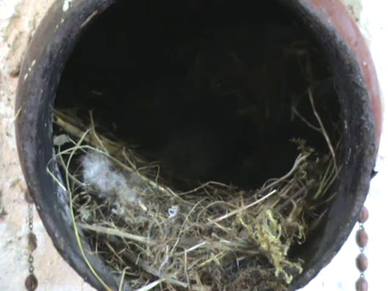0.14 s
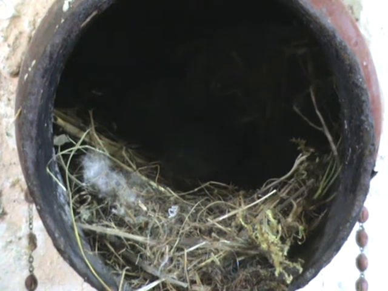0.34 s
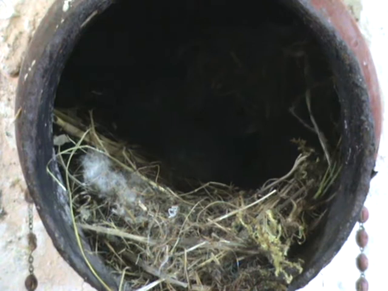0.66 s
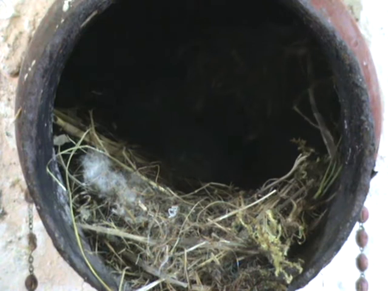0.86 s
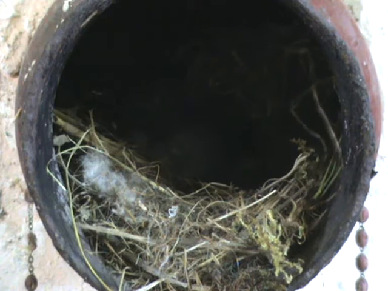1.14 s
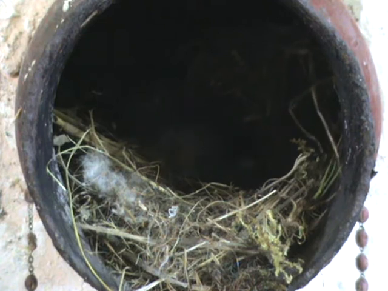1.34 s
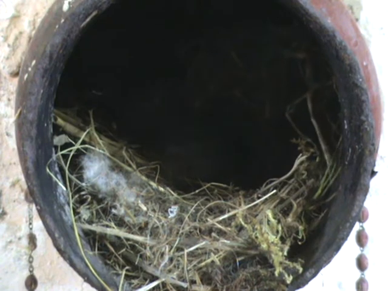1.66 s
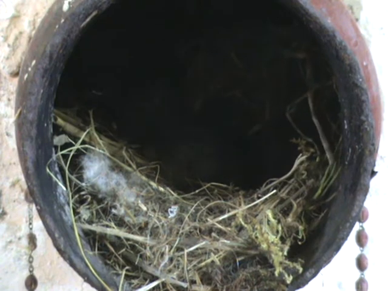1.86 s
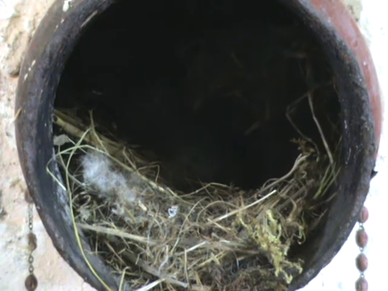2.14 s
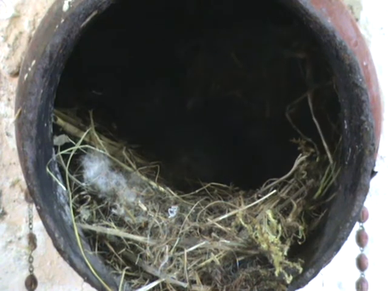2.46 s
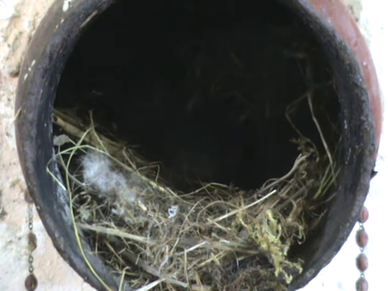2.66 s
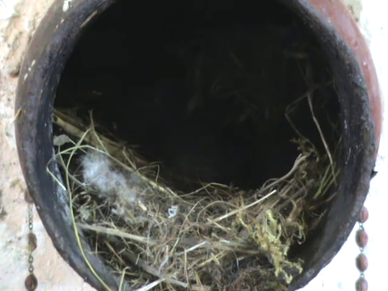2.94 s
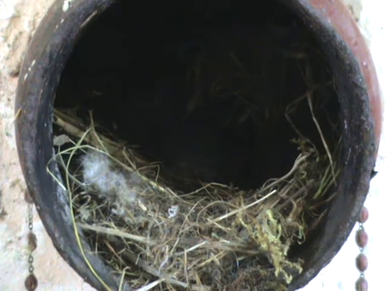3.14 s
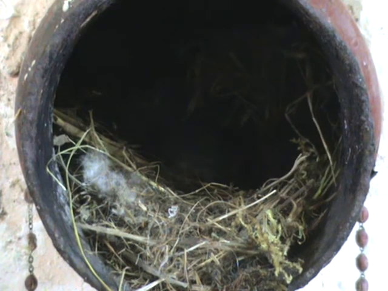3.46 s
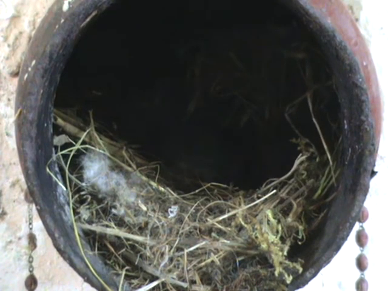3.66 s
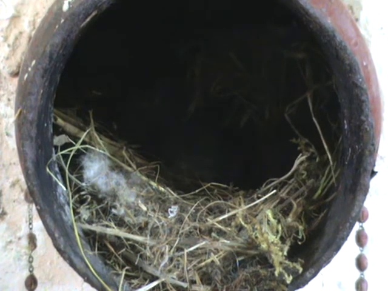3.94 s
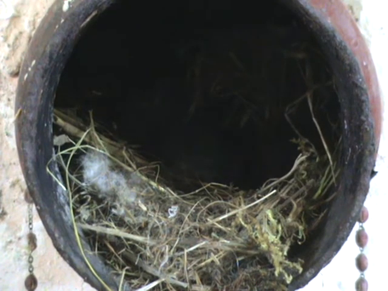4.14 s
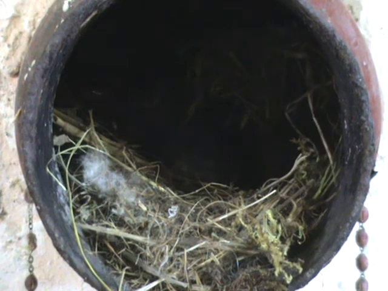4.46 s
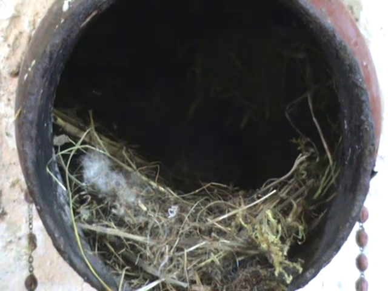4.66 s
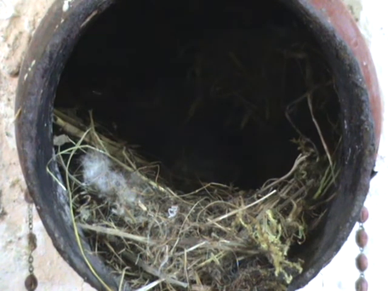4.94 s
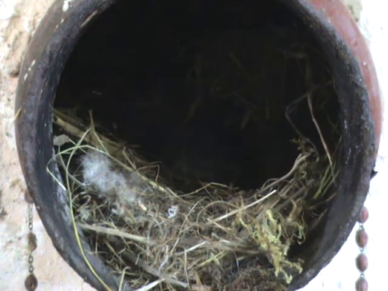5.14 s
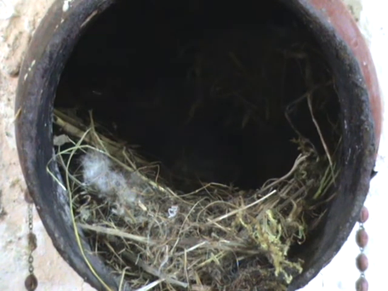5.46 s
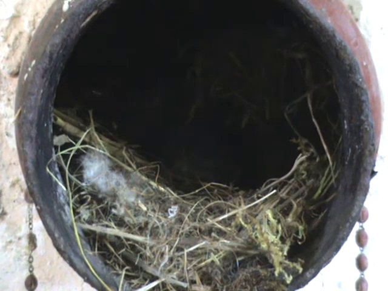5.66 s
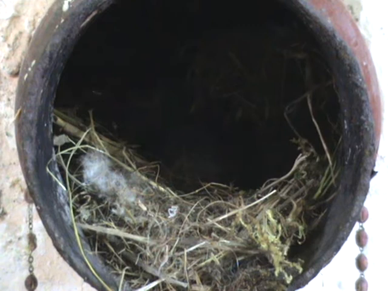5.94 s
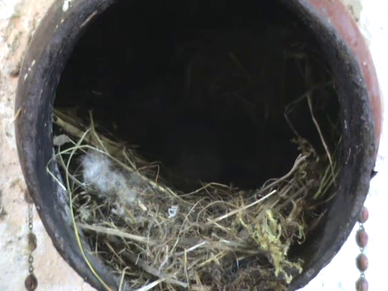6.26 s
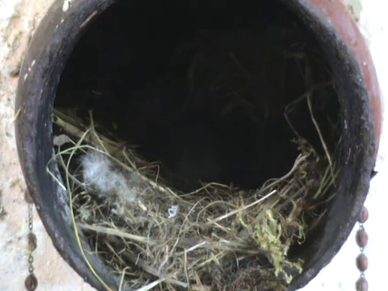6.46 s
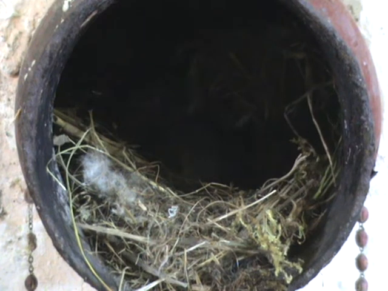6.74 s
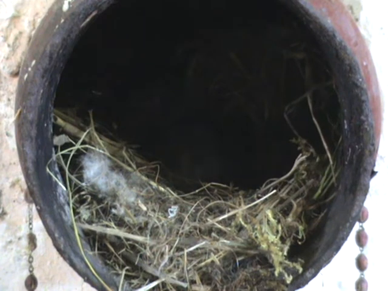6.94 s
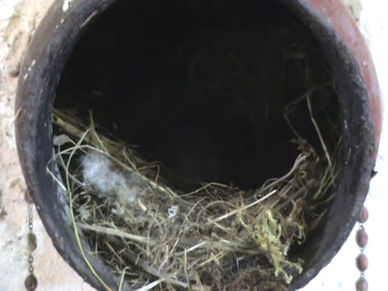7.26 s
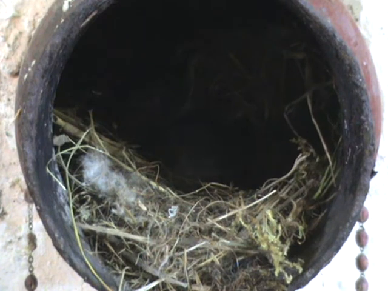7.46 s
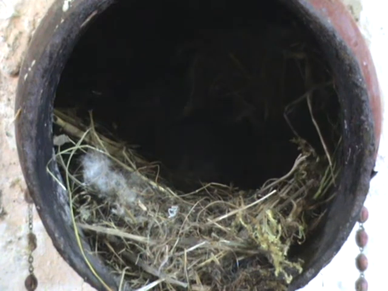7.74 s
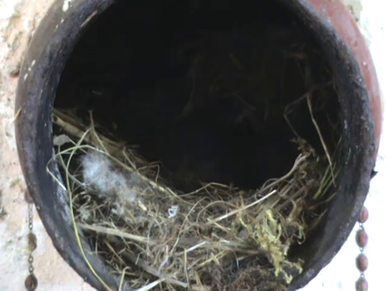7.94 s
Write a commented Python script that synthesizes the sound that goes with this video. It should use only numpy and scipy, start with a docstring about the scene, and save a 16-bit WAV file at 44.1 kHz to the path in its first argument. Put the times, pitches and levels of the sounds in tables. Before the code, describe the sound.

Rapid, needle-sharp begging chirps, each under a tenth of a second with a fast buzzy flutter, come from near the microphone and ring briefly in the pot. They start strong and dense, become scattered after three seconds, and fade to isolated weak peeps after six. Underneath are a very quiet steady hiss, low hum, slight nest rustles and, later, remote slurred bird whistles.

```python
"""Nestlings beg from a grass nest inside a clay pot hung on a wall.
Their thin calls are fast trills, often sung with both sides of the syrinx, and ring on in the pot; the begging thins out.
A chick knocks against the nest, other birds whistle far away, and a faint hum and hiss lie underneath."""
import sys
import numpy as np
from scipy import signal
from scipy.fft import rfft, irfft
from scipy.io import wavfile
from scipy.ndimage import map_coordinates

SR = 44100
rng = np.random.default_rng(int(sys.argv[2]) if len(sys.argv) > 2 else 0)


def master_out(mix):
    """Clip the mix to full scale and print it as 16-bit PCM to the path in sys.argv[1]."""
    frames = np.transpose(np.atleast_2d(mix))
    ceiling = np.clip(frames, -1, 1)
    pcm = np.round(ceiling * 32767).astype(np.int16)
    wavfile.write(sys.argv[1], SR, pcm)


N = 357210

# first bounces off the pot wall: (delay ms, dB)
WALL_BOUNCES = [(0.446, -12.5), (1.151, -16), (1.899, -18)]
# whistles of distant birds: (s, length s, first pitch Hz, last pitch Hz, level dB, rasp Hz)
WHISTLES = [(5.25, 0.29, 4100, 3337, -70, 59.3), (5.898, .31, 4090, 3263, -68.5, 60.7), (6.281, 0.28, 7160, 6430, -70, 90),
            (6.349, 0.11, 3560, 3510, -73, 25), (6.706, 0.086, 3530, 3600, -73, 60), (7.09, 0.12, 3530, 3610, -71, 25),
            (7.154, 0.52, 6670, 6400, -81, 90), (7.46, .06, 4800, 4600, -78, 150),
            (7.705, 0.077, 4400, 3860, -73, 220), (7.792, 0.042, 2790, 2710, -71, 160), (8.038, 0.067, 3690, 3420, -70.5, 298)]
TWITTER_COLOUR = [(1500, -17), (2200, 0), (3300, 2.5), (3900, -12), (5000, -59)]   # (Hz, dB)
# chicks stirring: (s, knock on the pot dB, straw crackle dB)
STIRS = [(.348, -69, -60), (.369, -60, -75), (.496, -86, -70), (.778, -60, -70), (.81, -70, -62), (2.378, -88, -66), (3.099, -88, -66), (3.775, -88, -65), (4.092, -76, -70), (5.018, -74, -60.5), (6.974, -88, -66.5)]
POT_MODES = [(757, 3, 0.039), (920, 6.5, 0.039), (1150, 1, 0.06), (1380, 2, 0.02), (2150, -1, 0.053), (3630, 4.5, 0.017)]   # (Hz, dB, t60 s)
# steady hum: (Hz, dB common to both channels, dB opposed between them)
HUM = [(71.2, -75.5, -100), (352, -85, -94), (488, -91.5, -86), (769, -90.5, -87), (841, -80.5, -81), (910.4, -82, -77), (1187, -92, -78.5), (1257, -93, -73), (1340, -94.5, -85)]
# hiss common to both channels, and hiss opposed between them: (Hz, dB per Hz)
COMMON_HISS = [(25, -12), (45, 8.5), (60, 5), (100, 4), (160, 2.5), (400, 0), (1000, -2), (2000, -4), (5000, -4), (9000, -6), (13000, -6.5), (16000, -6)]
OPPOSED_HISS = [(24, -48), (40, -22), (103, -8), (387, -1.5), (778, -2), (1100, -8.5), (1220, -8.5), (1820, -6),
                (3560, -12.5), (5860, -15.5), (6480, -18), (6980, -18.5), (15500, -30)]
COMMON_DB, OPPOSED_DB = -69.5, -67
POT_T60_S, POT_RING_DB = 0.6, -15
CUTOFF_HZ = 15800   # fixed
TIME = np.arange(N) / SR
# each way of calling: (trill depth Hz at the reference level, share of that depth at the start, trill rate Hz,
# throb dB, # attack dB, swell dB, octave overtone dB, first and last pitch of the second, mostly lower voice
# Hz)
VOICES = {"low": (490, .5, 77, -0.5, 8.5, 5.5, -33.5, 6203, 5849.5),
          "high": (405, 0.51, 80, -2, 6, 8.5, -34, 6780, 6594),
          "two-note": (304, 1.1, 75, -0.5, 12, 5.5, -26.5, 6065, 6024),
          "peep": (420, 1.6, 87, 0, 4, 3.5, -22.5, 5906, 7004)}
# begging calls of a low-voiced and a high-voiced chick, and soft peeps: # (s, voice, length s, middle pitch Hz,
# pitch fall Hz, level dB, second voice relative to it dB)
BEGS = [(0.036, "low", 0.091, 6590, 650, -28.5, -21), (0.222, "high", .081, 7280, 400, -34, -6), (0.494, "low", 0.068, 6660, 350, -35, -30),
        (.741, "peep", 0.062, 6890, 750, -44.5, -24), (0.85, "two-note", .073, 6890, 592, -35, -5.5), (1.062, "low", 0.086, 6590, 350, -33, -24),
        (1.154, "high", 0.073, 7270, 574, -33, -10), (1.429, "low", 0.085, 6230, 686, -29, -28), (1.553, "peep", 0.091, 6830, 604, -44.5, -17),
        (1.606, "high", 0.073, 7200, 260, -31.5, -16), (1.791, "low", 0.092, 6210, 454, -29.5, -16), (1.891, "high", 0.08, 7090, 444, -31.5, -17),
        (2.213, "low", 0.079, 6215, 300, -40, -10), (2.302, "high", 0.087, 7254, 297, -31.5, -14), (2.491, "low", 0.083, 6460, 533, -31, -10),
        (2.59, "high", 0.079, 7180, 510, -33.5, -24), (2.919, "low", 0.081, 6320, 522, -34.5, -34), (3.041, "high", 0.078, 7280, 545, -32.5, -16),
        (3.433, "low", 0.092, 6300, 400, -35, -18), (3.7, "high", 0.084, 7180, 268, -34.5, -13.5), (3.839, "peep", 0.058, 6620, 369, -55, -24),
        (4.087, "low", 0.072, 6415, 776, -36, -19), (4.314, "high", 0.0787, 7015, -180, -35.5, -16), (4.438, "peep", 0.05, 6660, 228, -55.5, -29),
        (4.672, "low", .067, 6400, 280, -40, -18), (5.013, "high", 0.083, 7060, -6, -38, -11), (5.127, "low", 0.064, 6410, 510, -41.5, -10),
        (5.54, "peep", 0.059, 6690, 0, -56.5, -30), (5.749, "low", .06, 6120, 550, -45, -14), (5.765, "high", 0.066, 6950, 102, -37, -11.5),
        (6.219, "peep", 0.061, 6650, 345, -53.5, -32), (6.847, "peep", 0.062, 6620, -290, -53, -30), (6.921, "high", 0.0652, 7190, 600, -41.5, -18),
        (7.762, "peep", 0.077, 6630, 140, -55, -30)]
# a louder call trills more widely: reference level, and dB of trill depth per dB of level
REFERENCE_DB, DEPTH_PER_EFFORT = -33, 0.64
ATTACK_SHARE, CREST_SHARE, RELEASE_SHARE = 0.19, 0.69, 0.81   # where the attack ends, the swell tops and the release begins
RELEASE_DB = 7.5
# bouts of distant twittering, each swelling and fading: (middle s, length s, level dB)
TWITTERS = [(3.95, 1.1, -82), (4.62, 1.1, -76), (5.7, 2.4, -84), (6.5, 0.41, -73.5), (6.85, 0.4, -72), (7.28, 0.68, -70.5), (8.004, 1.1, -79)]
TWITTER_FLOOR_DB = -85
FIRST_CREST_S, RATE_SCATTER = 0.01415, 0.034   # first pitch crest; share by which the trill rate differs between calls
TRILL_START_SHARE = None
TRILL_END_SHARE, WIDEST_SHARE = 0.62, 0.692   # share of the trill depth at the end; point of the call where the trill reaches full depth, then narrows
LOWER_TRILL_SHARE = .32
FADE_S = 0.0058   # a call opens and closes this fast
LOWER_PEAK_SHARE = 0.93   # the second voice holds to this point of the call, then gives way
LOWER_ATTACK_DB, LOWER_RELEASE_DB = 16, 13
CREST_POINT, TRILL_CORNER = 0.14, 0.085   # second and third harmonic of the trill: pointed crests, zigzag shape


def from_db(db):
    """Decibels to gain."""
    return 10 ** (np.asarray(db) / 20)


def rms_one(x):
    """Scale to unit power."""
    return x / np.sqrt(np.mean(x ** 2) + 1e-20)


def add(track, s, sound):
    """Mix a sound in at a time."""
    at = max(int(s * SR), 0)
    track[at:at + len(sound)] += sound[:N - at]


def wander(size, per_s):
    """Smooth chance of spread 1."""
    knots = rng.standard_normal(2000)  # fixed
    return map_coordinates(knots, [np.arange(size) * per_s / SR], order=3, mode="wrap")


def noise(spectrum):
    """Steady noise of a given colour."""
    hz, db = np.transpose(spectrum)
    bins = np.maximum(np.fft.rfftfreq(N, 1 / SR), 1)
    return rms_one(irfft(rfft(rng.standard_normal(N)) * from_db(np.interp(np.log(bins), np.log(hz), db)), N))


def delayed(x, ms):
    """The same sound a little later."""
    return irfft(rfft(x) * np.exp(-2j * np.pi * np.fft.rfftfreq(N, 1000 / SR) * ms), N)  # fixed


def reverberate(x, t60):
    """A dense tail of reflections with unit energy."""
    tail = rng.standard_normal(SR) * from_db(-60 * TIME[:SR] / t60)  # fixed
    return signal.fftconvolve(x, tail / np.linalg.norm(tail))[:N]


def syrinx(hz, overtone_db):
    """A nearly pure tone with a faint octave."""
    phase = 2 * np.pi * np.cumsum(hz) / SR
    return np.sqrt(2) * (np.sin(phase) + from_db(overtone_db) * np.sin(2 * phase))


def begging_call(voice, length, pitch_hz, fall_hz, level_db, lower_db):
    """One trill: the pitch sinks and swings with pointed crests; the call swells as the chick pushes harder."""
    depth_hz, start_share, rate_hz, throb_db, attack_db, swell_db, octave_db, lower_first_hz, lower_last_hz = VOICES[voice]
    t = TIME[:int(length * SR)]
    u = t / length
    turn = 2 * np.pi * rate_hz * (t - FIRST_CREST_S) * (1 + RATE_SCATTER * rng.standard_normal()) + 0.42 * wander(len(t), 59.2)
    trill = np.cos(turn) + CREST_POINT * np.cos(2 * turn) + TRILL_CORNER * np.cos(3 * turn)  # fixed
    width_hz = depth_hz * from_db(DEPTH_PER_EFFORT * (level_db - REFERENCE_DB))
    # no two swings are equally wide
    uneven = 1 + .16 * wander(len(t), 80)  # fixed
    swing = width_hz * np.interp(u, [0, WIDEST_SHARE, 1], [start_share, 1, TRILL_END_SHARE]) * trill * uneven
    # the pitch sinks fastest at the start
    centre = pitch_hz + fall_hz * (.5 - u ** .85) + 45 * wander(len(t), 52)
    effort_db = np.interp(u, [0, ATTACK_SHARE, CREST_SHARE, RELEASE_SHARE, 1], [-swell_db - attack_db, -swell_db, 0, 0, -RELEASE_DB])
    flutter_db = throb_db * trill + 2.2 * wander(len(t), 330)  # fixed
    upper = syrinx(centre + swing + 45 * wander(len(t), 681), octave_db) * from_db(effort_db + flutter_db - 2.0)
    # the other side of the syrinx sings a second, flatter note, mostly lower, that beats against the first
    lower_hz = lower_first_hz + (lower_last_hz - lower_first_hz) * u + LOWER_TRILL_SHARE * swing + 65 * wander(len(t), 556)
    lower_effort_db = np.interp(u, [0, ATTACK_SHARE, LOWER_PEAK_SHARE, 1], [-LOWER_ATTACK_DB, 0, 0, -LOWER_RELEASE_DB])
    lower = syrinx(lower_hz, octave_db) * from_db(lower_db + lower_effort_db + 1.3 * wander(len(t), 103))
    gate = np.clip(np.minimum(t, length - t) / FADE_S, 0, 1)
    return from_db(level_db) * (upper + lower) * np.sin(gate * np.pi / 2) ** 2


def nestlings():
    """The calls bounce in the pot, which makes their sweeps flutter, and ring on."""
    voices = np.zeros(N)
    for s, *call in BEGS:
        add(voices, s, begging_call(*call))
    near = voices + sum(from_db(db) * delayed(voices, ms) for ms, db in WALL_BOUNCES)
    sound = from_db(1.0) * near + from_db(POT_RING_DB) * reverberate(voices, POT_T60_S)
    diffuse = np.array([reverberate(voices, POT_T60_S) for side in range(2)])
    return np.array([delayed(sound, ms=0.0049), sound]) * from_db([[-1.2], [1.1]]) + from_db(-22.0) * diffuse


def stirring(crackle_t60=0.058):
    """A foot scuffs the straw and knocks dully on the clay."""
    knocks, straw, t = np.zeros(N), np.zeros(N), TIME[:SR // 10]
    for s, knock_db, straw_db in STIRS:
        for hz, db, t60 in POT_MODES:
            ring = np.sin(2 * np.pi * (hz * t + rng.random())) * from_db(-60 * t / t60)
            add(knocks, s, from_db(knock_db + db) * ring)
        add(straw, s, from_db(straw_db - 60 * t / crackle_t60) * rng.laplace(size=len(t)))
    return knocks + signal.sosfilt(signal.butter(2, [3400, 6000], "band", fs=SR, output="sos"), 2 * straw)


def distant_bird(glide_s=0.065, outdoor_t60=0.97):
    """Slurred whistles and twittering, blurred by the distance."""
    song, twitter = np.zeros(N), np.full(N, from_db(TWITTER_FLOOR_DB))
    for s, length, first_hz, last_hz, db, rasp_hz in WHISTLES:
        t = TIME[:int(length * SR)]
        hz = last_hz + (first_hz - last_hz) * np.exp(-t / glide_s) + rasp_hz * wander(len(t), 489)
        add(song, s, from_db(db) * syrinx(hz, overtone_db=-46) * signal.windows.tukey(len(t), .2))
    for s, length, db in TWITTERS:
        add(twitter, s - length / 2, from_db(db - 1.0) * np.hanning(int(length * SR)))
    echoes = np.array([reverberate(song, outdoor_t60) + twitter * noise(TWITTER_COLOUR) for side in range(2)])
    return from_db(-4.5) * song + echoes


def background(early_db=3.0):
    """Hum and hiss; the middle range is partly opposed between the channels, and the hiss eases slowly."""
    opposite, hum = np.array([[1], [-1]]), 0
    for hz, common_db, opposed_db in HUM:
        phase = 2 * np.pi * (hz * TIME + rng.random())
        hum = hum + np.sqrt(2) * (from_db(common_db) * np.sin(phase) + from_db(opposed_db) * np.cos(phase) * opposite)
    common = from_db(COMMON_DB) * noise(COMMON_HISS)
    opposed = from_db(OPPOSED_DB) * noise(OPPOSED_HISS) * opposite
    return hum + (common + opposed) * from_db(early_db * (1.5 - TIME / TIME[-1]))


def scene():
    """The nest in front, the outdoors behind."""
    return nestlings() + stirring() + distant_bird() + background()


def record(dry):
    """The top is cut steeply."""
    return signal.sosfilt(signal.ellip(12, .1, 70, CUTOFF_HZ, fs=SR, output="sos"), dry)


dry = scene()
out = record(dry)
master_out(out)
```